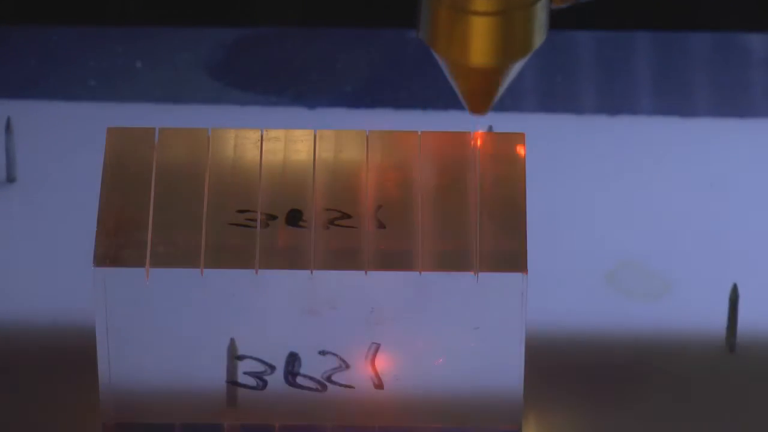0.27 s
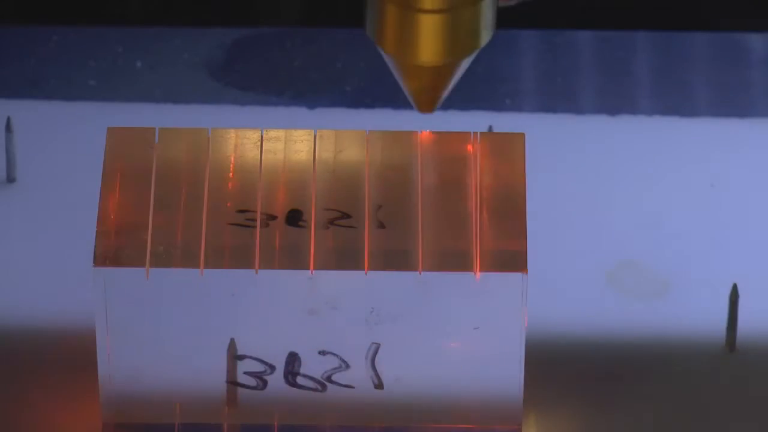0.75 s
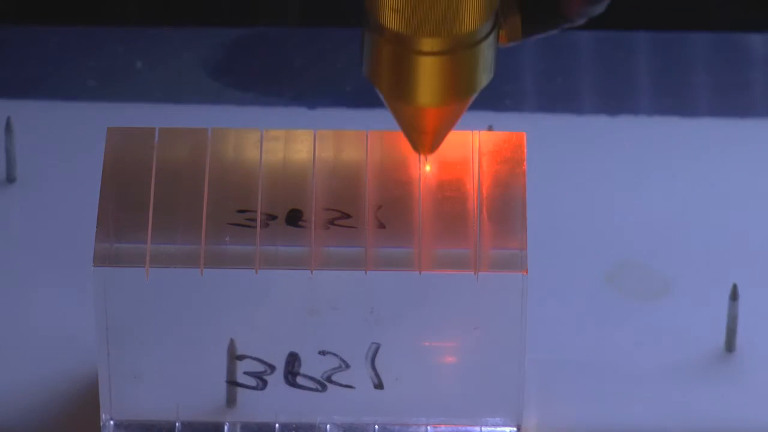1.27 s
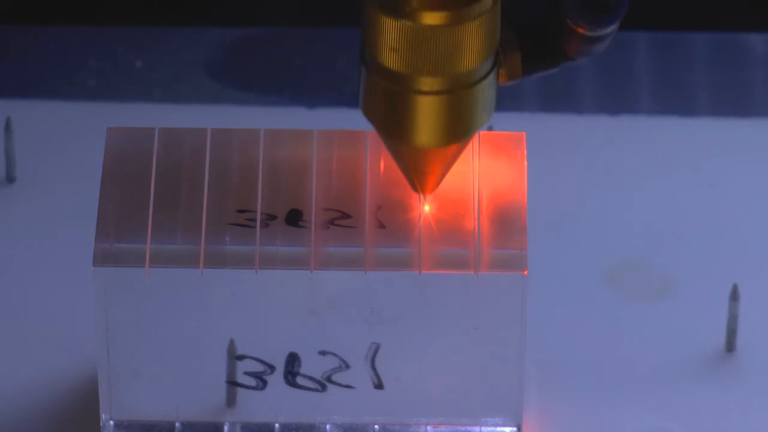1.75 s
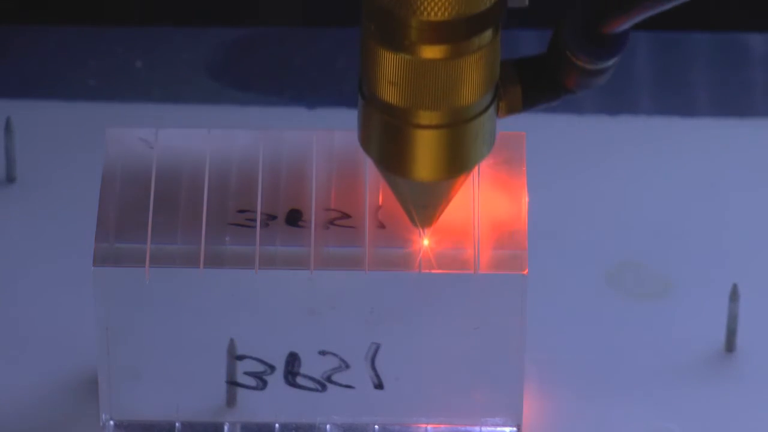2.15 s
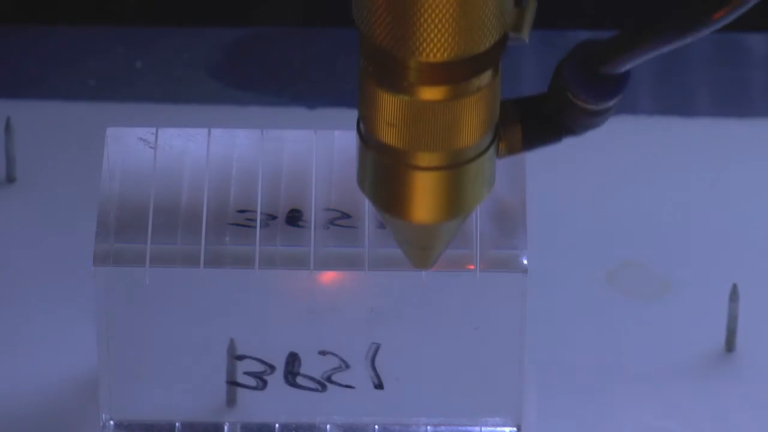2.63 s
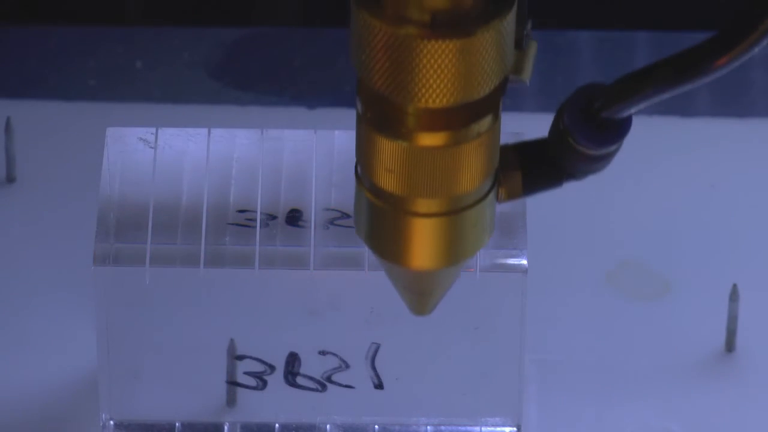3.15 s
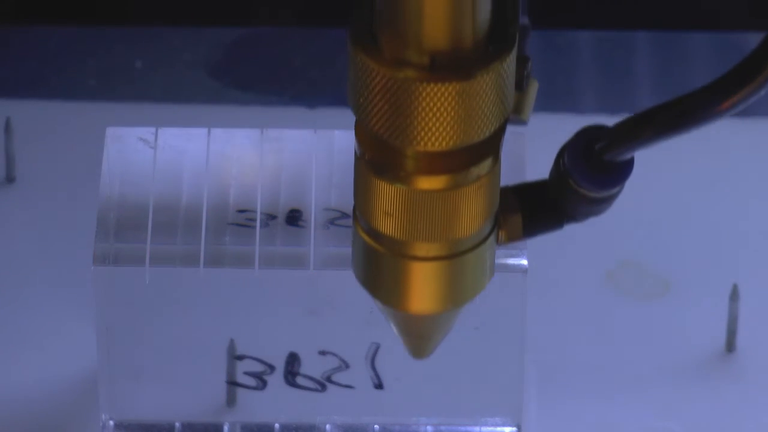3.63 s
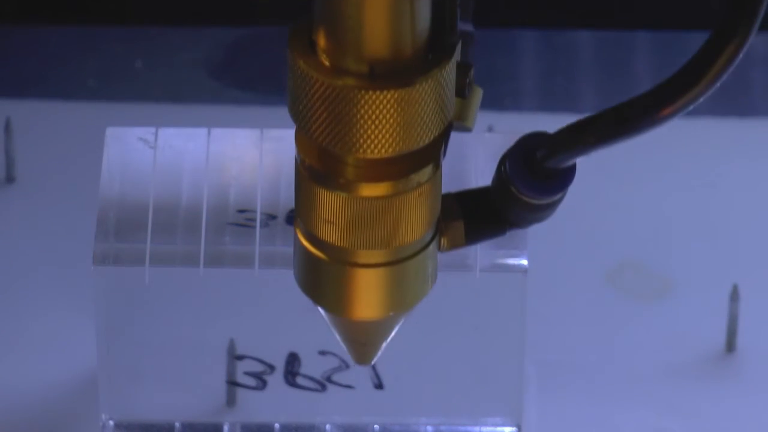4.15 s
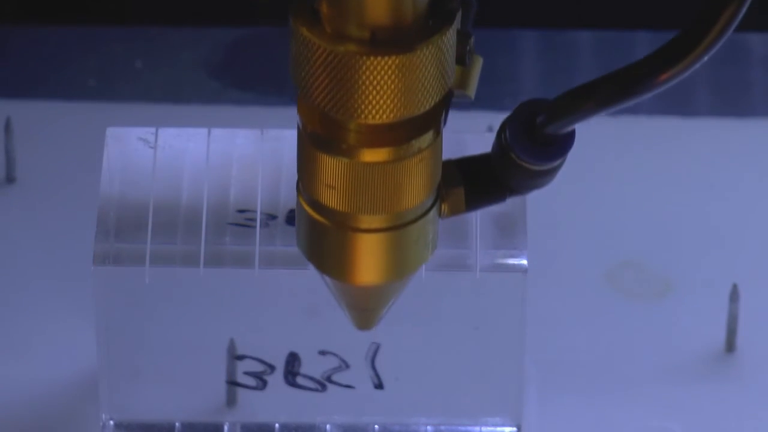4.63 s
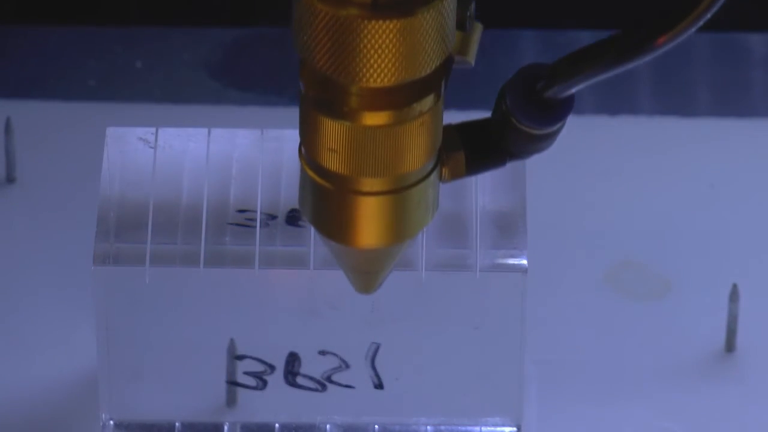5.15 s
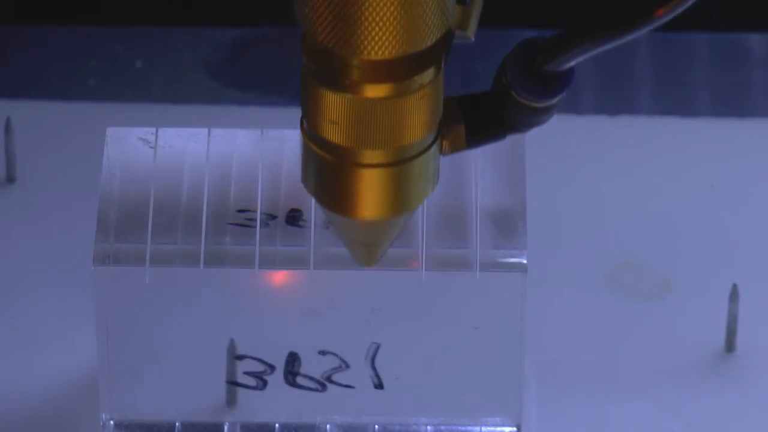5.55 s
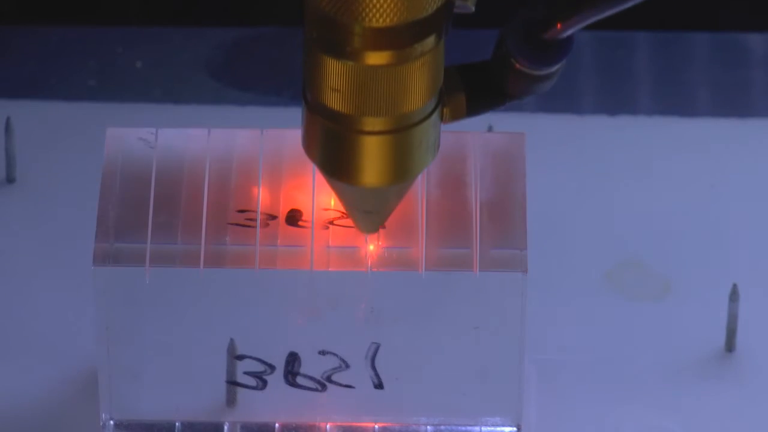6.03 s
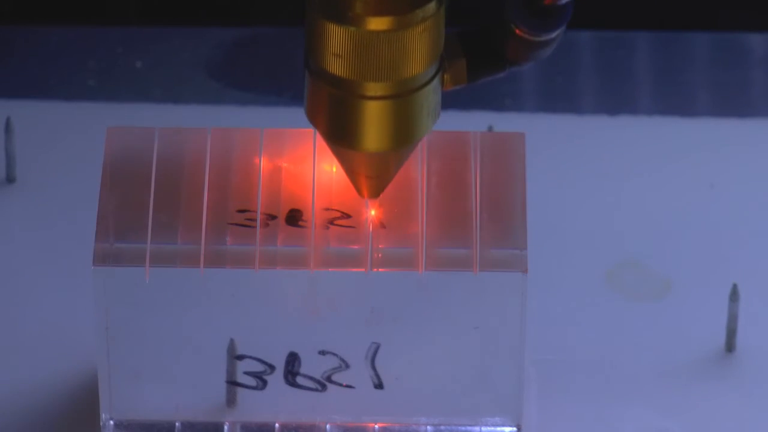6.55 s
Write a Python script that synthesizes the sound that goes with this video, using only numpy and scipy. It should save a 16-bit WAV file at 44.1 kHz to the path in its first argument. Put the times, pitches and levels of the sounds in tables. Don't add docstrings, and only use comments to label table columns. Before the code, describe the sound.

Dense low machine drone and rushing, hissing air jet, with a motor buzz that drops lower midway after soft thuds, and hiss brightening again near the end.

```python
import sys
import numpy as np
from scipy import signal
from scipy.fft import rfft, irfft, next_fast_len
from scipy.io import wavfile
from scipy.ndimage import map_coordinates

SR = 44100
rng = np.random.default_rng(int(sys.argv[2]) if len(sys.argv) > 2 else 0)


def natural_amplitude(level_db):
    exponent = np.asarray(level_db, float) / 20
    return 10 ** exponent


def inscribe(sig):
    pcm = np.round(np.clip(np.atleast_2d(sig).T, -1, 1) * 32767)
    wavfile.write(sys.argv[1], SR, pcm.astype(np.int16))


N = 299439


def drift(rate):
    pole = np.exp(-200 * np.pi * rate / SR)
    slow = signal.lfilter([1], [1, -2 * pole, pole * pole], rng.standard_normal(N // 100 + 3002))
    slow = slow[3000:]
    slow = (slow - slow.mean()) / slow.std()
    return np.interp(np.arange(N) / 100, np.arange(len(slow)), slow)


def tone(phase, db, lean_db=0, lead=0.4, start=None):
    side = np.array([[.5], [-.5]])
    start = rng.uniform(0, 2 * np.pi) if start is None else start
    return np.sqrt(2) * natural_amplitude(db + lean_db * side) * np.cos(phase + lead * side + start)


def at_hz(points, hz):
    table_hz, value = np.transpose(points)
    return np.interp(np.log(hz), np.log(table_hz), value)


def air_noise(spectrum, peaks=()):
    # hz [Hz], likeness [-1..1]
    likeness = [(60, 0.28), (130, 0.66), (290, 1), (640, 0.4), (1410, 0.71), (3100, 0.86), (6820, 0.99),
                (15000, 0.58)]
    # hz [Hz], lean_db [dB]
    lean_points = [(60, -4), (150, -6), (380, 3), (950, 1.5), (2380, 0.5), (5980, -1), (15000, -1)]
    size = next_fast_len(N)
    hz = np.arange(size // 2 + 1) * SR / size + 1
    level_db = at_hz(spectrum, hz)
    for top_hz, width_hz, lift_db in peaks:
        level_db = level_db + lift_db / (1 + (2 * (hz - top_hz) / width_hz) ** 2)

    walls = np.zeros(size)
    walls[0] = 1
    echo_at = (np.geomspace(.003, .02, num=9) * SR).astype(int)
    walls[echo_at] = .07 * (-1) ** np.arange(9)

    mid, side = rfft(rng.standard_normal((2, size))) * natural_amplitude(level_db) * rfft(walls)
    alike = np.clip(at_hz(likeness, hz), 0, 1)
    lean = natural_amplitude(at_hz(lean_points, hz) / 2)
    mid = np.sqrt(1 + alike) * mid
    side = np.sqrt(1 - alike) * side
    out = irfft([(mid + side) * lean, (mid - side) / lean], size)[:, :N]
    return out / np.sqrt(np.mean(out ** 2))


def moving_echoes(x, share, wander_s):
    lags_s = (.0011, .0023, .0041, .0073)
    out, now = x.copy(), np.arange(N)
    pole = np.sqrt(3) - 2
    knots = signal.filtfilt([np.sqrt(-6 * pole)], [1, -pole], x)
    for lag_s in lags_s:
        then = now - SR * (lag_s + wander_s * drift(0.31))
        echo = [map_coordinates(ear, [then], order=3, mode="wrap", prefilter=False) for ear in knots]
        out += share * np.array(echo)
    return out / np.sqrt(1 + len(lags_s) * share ** 2)


def bursts(t, rows):
    swell_s = .045
    power = 0
    for start_s, length_s, level_db in rows:
        inside_s = np.minimum(t - start_s, start_s + length_s - t)
        power = power + natural_amplitude(level_db) ** 2 * np.clip(inside_s / swell_s + .5, 0, 1)
    return power


def pump(t):
    # order [multiple of shaft], level_db [dB], lean_db [dB, left-right], lead [rad, left]
    orders = [(2, -53, 1, 0.6), (3, -49, -1, 0.2), (4, -39, -2, 0.3), (5, -50, -2, 0.2), (6, -47, -1, -0.2),
              (7, -38, -4, 0.2), (8, -42, -5, 0.2), (9, -38, 2, 0.5), (10, -39, -2, 0.6),
              (11, -50, -4, -0.2), (12, -31, 0, 0.2), (13, -32, -2, 0.2), (14, -40, 8, -0.4),
              (15, -37, 3, 0.1), (16, -30, -2, 0.9), (17, -26.5, 1, 0.0), (18, -30, 0, 0.2),
              (19, -32, 1, 0.3), (20, -46, 8, -0.8), (21, -45, 4, 1.0), (23, -45, 7, 0.4),
              (24, -32, 4, -0.1), (25, -49, 6, 1.0), (26, -36, 5, -0.3), (27, -41, 4, 0.2),
              (28, -50, 2, 0.4), (29, -47, -4, -0.3), (30, -42, 4, 0.1), (31, -42, 0, 0.1),
              (32, -43, 4, 0.2)]
    # time_s [s], shaft_hz [Hz]
    shaft_speed = [(0, 46.125), (3.5, 46.122), (4.5, 46.1), (6.79, 46.104)]
    # order [multiple of shaft], level_db [dB]
    half_orders = [(14.5, -57), (15.5, -45), (16.5, -71), (17.5, -49), (28.5, -58), (30.5, -48)]
    # order [multiple of shaft], level_db [dB]
    upper_orders = [(33, -55), (34, -54), (35, -47), (36, -50), (37, -52), (40, -53), (43, -51), (44, -50),
                    (45, -51), (46, -52), (48, -48)]
    stroke_smear = -1.36, .608, .89, -.194
    # order [multiple of shaft], level_db [dB]
    strong_beats = [(7, -49), (8, -49), (9, -44), (16, -49), (17, -38), (18, -45), (19, -46), (21, -47),
                    (24, -47), (25, -47), (27, -48)]
    mains_pull_hz, beat_db, beat_lag_rad = 99.82, -54, .75

    t = t[::8]
    shaft = 2 * np.pi * np.cumsum(np.interp(t, *np.transpose(shaft_speed))) * 8 / SR
    slip = 2 * np.pi * mains_pull_hz * t - 2 * shaft
    out = sum(tone(round(2 * k) / 2 * shaft, db, 1.5) for k, db in half_orders + upper_orders)
    beats = {round(k): db for k, db in strong_beats}
    for k, level_db, lean_db, lead in orders:
        waver = natural_amplitude(-0.6 + 0.55 * drift(0.48)[::8] + 1.37 * drift(15)[::8])
        smear = np.polyval(stroke_smear[::-1], k - 17)
        out += waver * tone(k * shaft, level_db, lean_db, lead, smear)
        upper_db = beats.get(k, min(beat_db, level_db - 4.0))
        upper_start = smear - beat_lag_rad if k in beats and k > 8 else None
        out += tone(k * shaft + slip, upper_db, lean_db, lead, upper_start)
        out += tone(k * shaft - slip, level_db - 24, lean_db, lead)
    return signal.resample_poly(out, 8, 1, axis=1)[:, :N]


def steady_tones(t):
    # pitch_hz [Hz], level_db [dB]
    hum_tones = [(46.12, -68), (76.7, -56.5), (299.4, -51), (306.2, -49), (833.3, -45), (939.8, -43.5),
                 (3504, -51)]
    return sum(tone(2 * np.pi * pitch_hz * t, level_db) for pitch_hz, level_db in hum_tones)


def stepper(t, start_s, end_s, step_hz, overtones):
    running = np.clip(np.minimum(t - start_s, end_s - t) / 0.0069, 0, 1)
    buzz = 0
    for k, level_db in overtones:
        phase = 2 * np.pi * round(k) * step_hz * (t - start_s)
        buzz = buzz + tone(phase, level_db + 0.9 * drift(5), -1.5, start=0)
    return running * buzz


def stepper_moves(t):
    # harmonic [multiple of step rate], level_db [dB]
    cut_tones = [(1, -46), (2, -54), (3, -62), (4, -52), (10, -52)]
    sidestep_tones = [(1, -43)]
    forward_tones = [(1, -51.5), (2, -40), (3, -53), (4, -55), (6, -70), (10, -56)]
    back_tones = [(1, -73), (2, -38.5), (3, -55.5), (4, -52), (5, -55), (10, -42.5)]
    out = stepper(t, start_s=-.0966, end_s=.55, step_hz=130.4, overtones=cut_tones)
    out += stepper(t, start_s=.57, end_s=.7, step_hz=375, overtones=sidestep_tones)
    out += stepper(t, start_s=.7511, end_s=3.97, step_hz=108.15, overtones=forward_tones)
    out += stepper(t, start_s=4.2251, end_s=6.9, step_hz=85.8, overtones=back_tones)
    return out


def extractor():
    # hz [Hz], level_db [dB per Hz]
    rush = [(25, -43), (60, -26), (90, -15), (150, -15.5), (230, -7.5), (265, -25.5), (400, -3),
            (600, -9.5), (800, -1), (950, -7), (1150, -4), (1500, -7), (2500, -14), (4000, -70)]
    return natural_amplitude(-29.5 + .5 * drift(6.8)) * air_noise(rush)


def free_jet():
    # hz [Hz], level_db [dB per Hz]
    jet_colour = [(700, -25), (1500, -3), (2300, -2), (3200, -2), (4200, -7), (5600, -9), (6300, -6),
                  (8000, -5.0), (8600, -17), (9500, -23), (11500, -27), (13800, -28), (14600, -33),
                  (16000, -39)]
    # top_hz [Hz], width_hz [Hz], lift_db [dB]
    resonances = [(1963, 260, 7.2), (3370, 360, 2.9), (3534, 270, 5.5), (3810, 110, 1.8), (2935, 270, 4.9),
                  (2370, 46, 9.4), (4380, 60, 5.5), (5070, 250, 3.6), (6230, 310, 5.5), (6530, 160, 8),
                  (7040, 62, 4), (8000, 1120, 6.5), (8640, 370, 4.3), (13600, 300, 3)]
    hiss = natural_amplitude(-29 + 0.49 * drift(8.4)) * air_noise(jet_colour, resonances)
    return moving_echoes(hiss, share=0.17, wander_s=.00006)


def jet_splash(t):
    # time_s [s], cover [share]
    cover_points = [(0, 0.45), (.75, 0.45), (1.4, 0.7), (2.3, 0.87), (2.52, 1.4), (2.64, .65), (2.8, 0.3),
                    (3.5, 0.18), (5.0, 0.33), (5.75, 0.4), (5.95, 0.86), (6.79, .9)]
    # start_s [s], length_s [s], level_db [dB]
    edges = [
        (-.03, 0.091, -30.5),
        (.24, 0.066, -37),
        (2.423, .26, -36),
        (5.78, .14, -34),
        (6.1, 0.15, -42),
    ]
    # start_s [s], length_s [s], level_db [dB]
    flares = [
        (-.03, 0.55, -43),
        (0.783, .29, -42),
        (1.27, .12, -45),
        (1.78, .27, -47),
        (2.2, 0.37, -45),
        (5.917, 0.3, -42),
        (6.4, .45, -47),
    ]
    # hz [Hz], level_db [dB per Hz]
    low_colour = [(1500, -2), (2100, -2.5), (2450, 4.5), (2900, -11), (3600, -28.5)]
    mid_colour = [(2800, -10.5), (3500, -0.5), (3750, 2), (4000, 1), (4800, -1), (6500, -5), (8000, -10),
                  (9000, -39)]
    high_colour = [(7000, -25), (8600, 0), (10000, -3), (12000, -9), (14000, -13), (16000, -16)]

    cover = np.clip(np.interp(t, *np.transpose(cover_points)), 0, None)
    roar = np.sqrt(natural_amplitude(-38) ** 2 * cover ** 0.38 + bursts(t, edges))
    spray = natural_amplitude(-30.5) * np.sqrt(cover)
    sizzle = np.sqrt(natural_amplitude(-45.5) ** 2 * (0.38 + cover ** 2) + bursts(t, flares))
    splash = spray * natural_amplitude(0.96 * drift(17)) * air_noise(mid_colour)
    splash += roar * natural_amplitude(0.63 * drift(8.5)) * air_noise(low_colour)
    splash += sizzle * natural_amplitude(0.95 * drift(10)) * air_noise(high_colour)
    return moving_echoes(splash, share=0.26, wander_s=.0001)


def nozzle_whistle(t):
    # hz [Hz], level_db [dB per Hz]
    whistle_colour = [(12200, -30), (12760, -13), (12880, 0), (12990, -12), (13700, -15), (14200, -30)]
    # start_s [s], length_s [s], level_db [dB]
    catches = [
        (.3, .2, -55),
        (.72, .35, -55.5),
        (1.25, .15, -56),
        (2.55, .3, -57),
        (3.15, .6, -53),
        (4.02, .9, -52),
        (4.98, .13, -54),
        (5.9, .35, -55),
        (6.45, .3, -56),
    ]
    level = np.sqrt(natural_amplitude(-57) ** 2 + bursts(t, catches))
    return level * natural_amplitude(.9 * drift(12)) * air_noise(whistle_colour)


def gantry():
    # start_s [s], pitch_hz [Hz, ringing
    # resonance], level_db [dB]
    jolts = [(.535, 223, -33.5), (.645, 230, -38), (.73, 203.5, -36), (3.975, 215, -34), (3.97, 295, -39),
             (4.065, 229, -36), (4.15, 162, -35.5), (4.13, 199, -51), (5.78, 814, -35), (5.82, 920, -32),
             (5.9, 800, -40), (6.1, 810, -28), (6.14, 900, -34)]
    # (start_s, level_db)
    thumps = [(.53, -39), (.71, -39), (3.97, -38), (4.12, -39), (4.23, -43)]
    rise_s, t60_s, glide_s, split_hz = 0.025, 0.18, 0.027, 19.6

    lines = [(s, hz, hz + way * split_hz, db) for s, hz, db in jolts for way in (1, -1)]
    lines += [(s, 153, 97, db) for s, db in thumps]
    out = np.zeros((2, N + SR))
    age = np.arange(SR // 2) / SR
    swell = np.minimum(age / rise_s, 1) * natural_amplitude(-60 * (age / t60_s) ** 2)
    for start_s, from_hz, to_hz, level_db in lines:
        pitch_hz = to_hz + (from_hz - to_hz) * np.exp(-age / glide_s)
        at = int(start_s * SR)
        out[:, at:at + len(age)] += swell * tone(2 * np.pi * np.cumsum(pitch_hz) / SR, level_db, -1.5)
    return out[:, :N]


def scene():
    t = np.arange(N) / SR
    machine = pump(t) + steady_tones(t) + stepper_moves(t)
    air = extractor() + free_jet() + jet_splash(t) + nozzle_whistle(t)
    return machine + air + gantry()


def band_limit(x):
    return signal.sosfilt(signal.butter(12, 15700, fs=SR, output="sos"), x)


def record(dry):
    bass_cut = signal.butter(1, 45, "high", fs=SR, output="sos")
    mix = signal.sosfilt(bass_cut, dry)
    return band_limit(mix)


dry = scene()
out = record(dry)
inscribe(out)
```